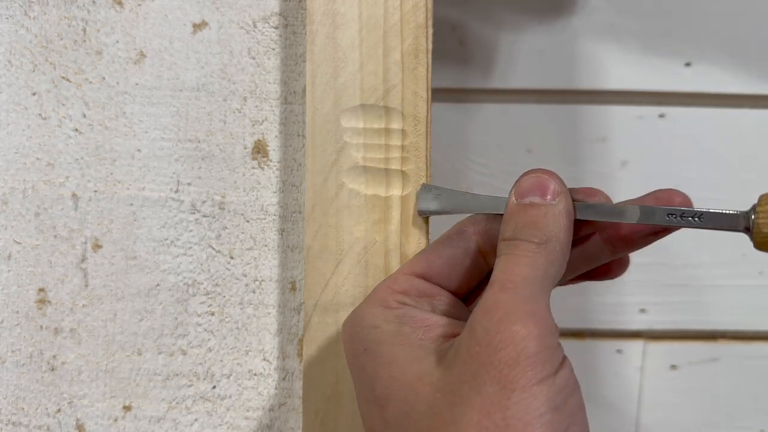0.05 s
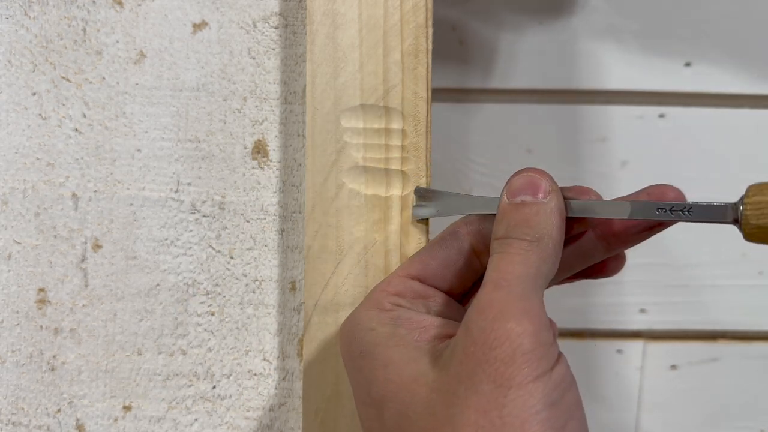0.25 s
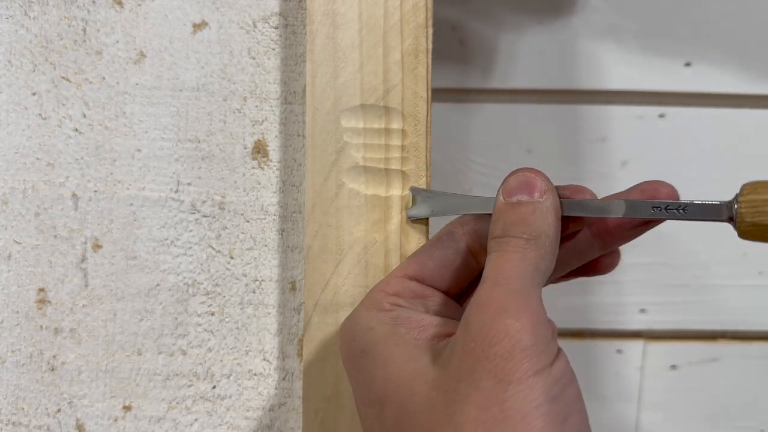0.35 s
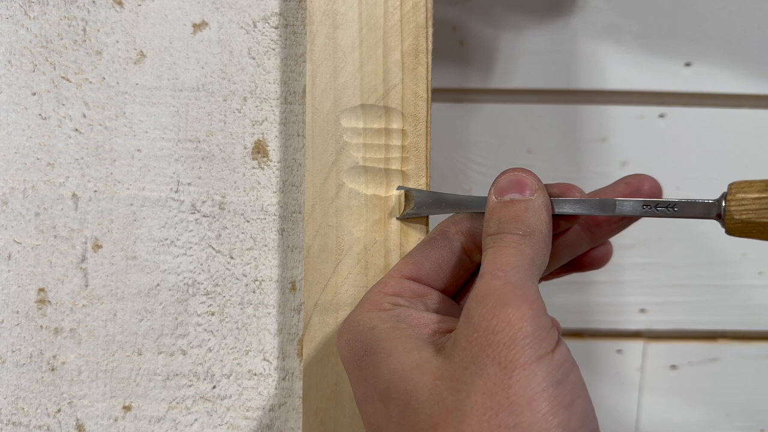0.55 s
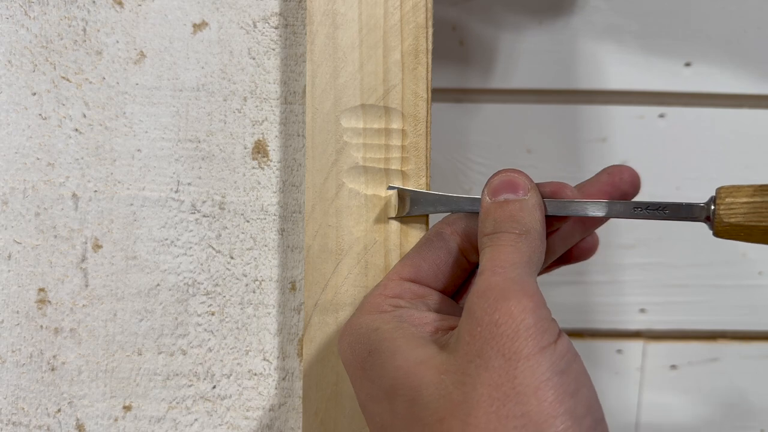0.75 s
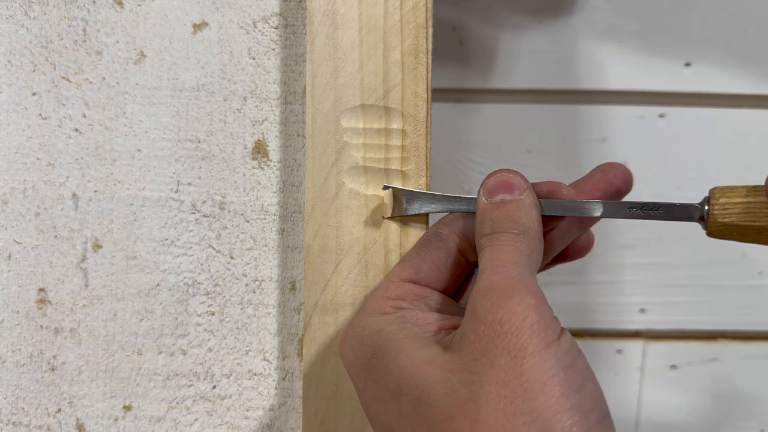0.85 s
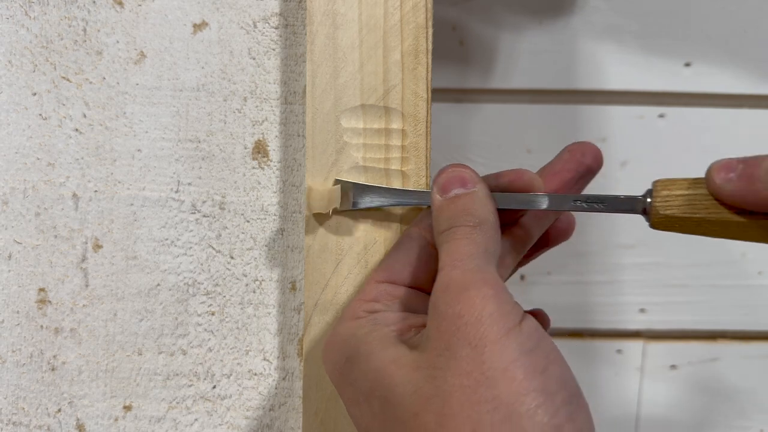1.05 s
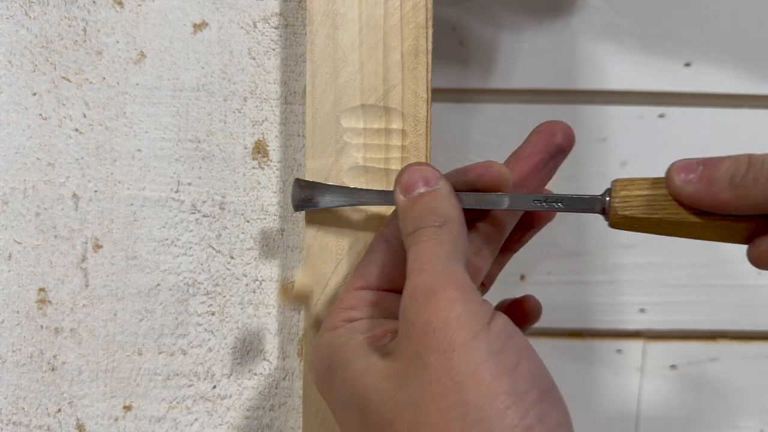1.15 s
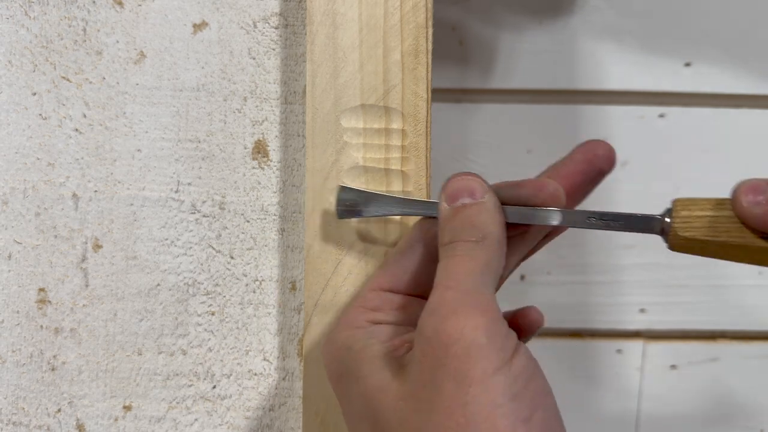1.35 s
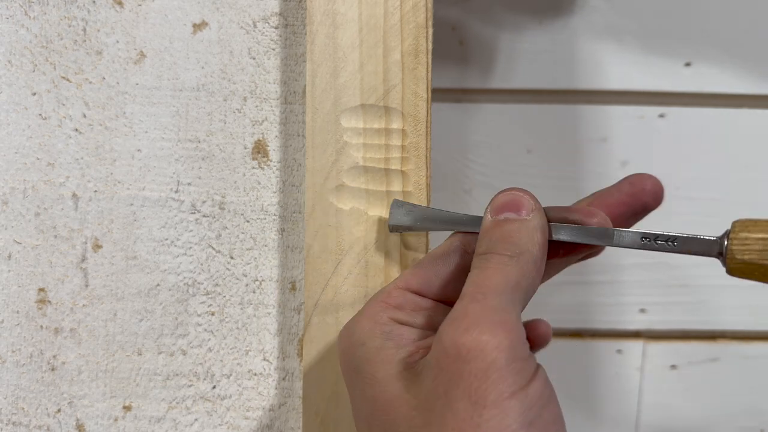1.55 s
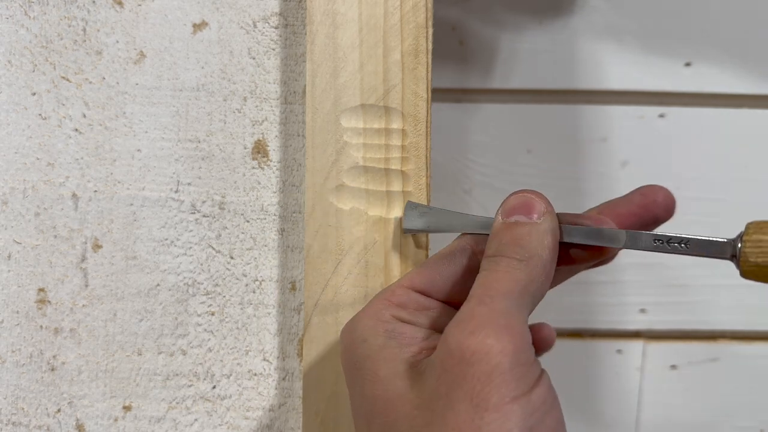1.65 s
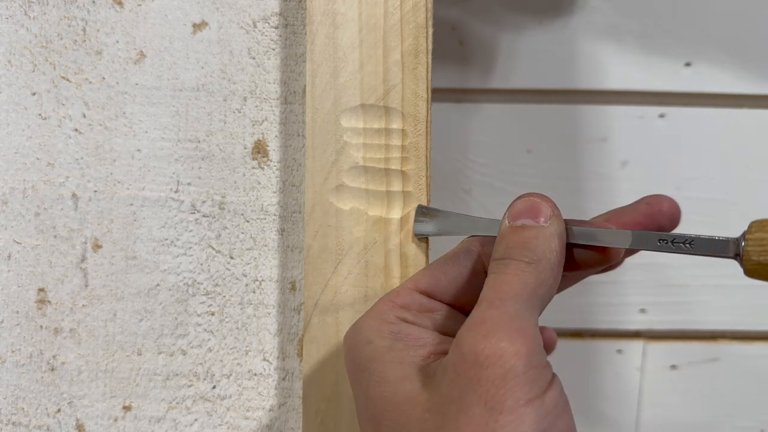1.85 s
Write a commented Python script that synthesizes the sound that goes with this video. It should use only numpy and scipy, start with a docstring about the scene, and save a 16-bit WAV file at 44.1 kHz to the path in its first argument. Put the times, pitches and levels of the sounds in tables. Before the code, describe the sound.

Three short crunching cuts of a gouge carving wood, then light taps of the blade.

```python
"""Three quick crunching, rasping strokes: a hand gouge cuts a softwood board close by in a small room.
Wood fibres snap under the edge and shake the board; in the last push the edge chatters and tears
the chip free. The blade ticks as it lifts, is set down with two taps and starts the next cut.
Underneath are soft thuds of the bench, a low rumble, a thin hum and a faint hiss of air."""
import sys
import numpy as np
from scipy import signal
from scipy.fft import rfft, irfft
from scipy.io import wavfile
from scipy.ndimage import uniform_filter1d

SR = 44100
rng = np.random.default_rng(int(sys.argv[2]) if len(sys.argv) > 2 else 0)


def digitize_waveform(pressure):
    """Quantize a signal to 16-bit integers and store it at the path in sys.argv[1].

    Rows of a 2-D input are taken as channels; values are limited to [-1, 1].
    """
    field = np.atleast_2d(pressure).T
    bounded = np.clip(field, -1, 1)
    quanta = np.round(bounded * 32767).astype(np.int16)
    wavfile.write(sys.argv[1], SR, quanta)


N = 83790
TIME = np.arange(N) / SR

# How loud the cut is. Each row: time in seconds, relative levels of the crunch and the rasp in dB.
CUT_LEVELS = [(0.06, -89.5, -100), (0.128, -73.5, -105), (0.143, -57, -82), (0.175, -47.5, -63.5),
              (0.206, -43.5, -58), (0.276, -47.5, -70.5), (0.296, -42.5, -64.5), (0.362, -42, -63.5),
              (0.385, -44, -67), (0.41, -55.5, -74.5), (0.448, -53.5, -73), (0.475, -42.5, -63.5),
              (0.508, -39.5, -54.5), (0.54, -39, -62.5), (0.602, -41, -62.5), (0.63, -70.5, -90.5),
              (0.741, -78, -85.5), (0.748, -53.5, -73.5), (0.785, -41.5, -63.5), (0.816, -42.5, -66),
              (0.866, -35.5, -54), (0.905, -39, -54.5), (0.955, -35, -49.5), (0.98, -36.5, -47.5),
              (1.026, -35, -62), (1.04, -65, -95), (1.1, -110, -120), (1.8, -110, -120),
              (1.828, -59.5, -76), (1.858, -58, -73.5), (1.868, -50.5, -62.5), (1.89, -45.5, -59),
              (1.9, -39.5, -56)]
SNAPS_PER_S, SNAP_SPREAD_DB = 3500, 3.0


def crunch(grip):
    """Snapping fibres shake the board and make it ring."""
    # The board's tone. Each row: frequency in Hz, relative level in dB.
    board_tone = [(40, -16), (110, -8.5), (220, -5), (275, -11.5), (360, -2.5), (680, -2.5), (1050, -8.5),
                  (1300, -10), (2150, -7), (2450, -15.5), (3100, -20.5), (4300, -23.5), (8000, -40),
                  (16000, -74.5)]
    fibres = snaps(SNAPS_PER_S, SNAP_SPREAD_DB) * grip * level(CUT_LEVELS)
    return amp(-2) * through(fibres, colour(board_tone, ringing_db))


def edge(grip):
    """The steel rasps finely in the wood, and the chip tears free with a bright rip."""
    # How loud the tearing is. Each row: time in seconds, relative level in dB.
    tear_levels = [(0.908, -100.5), (0.925, -43.5), (0.946, -36), (0.975, -41), (1.012, -39.5),
                   (1.018, -40.5), (1.026, -37.5), (1.031, -96)]
    # The tones of the rasp and the rip. Each row: frequency in Hz, relative level in dB.
    rasp_tone = [(500, -30.5), (2500, 5), (3300, 1), (4200, -4), (6300, 6.5), (7500, -5.5), (8600, 3),
                 (11000, 0), (12700, -3), (16000, -8)]
    rip_tone = [(500, -3.5), (3000, 1.5), (5000, -2.5), (6300, 1.5), (7600, -5), (9200, 3.5), (12200, 0),
                (14500, 1), (16000, -4)]
    scraping = splinters(per_s=5000, spread_db=1.5) * grip * level(CUT_LEVELS, column=2)
    tearing = splinters(per_s=4200, spread_db=-0.5) * grip * during(tear_levels)
    rasp = through(scraping, colour(rasp_tone, ringing_db))
    rip = through(tearing, colour(rip_tone, ringing_db))
    return amp(3) * rasp + amp(0.5) * rip


def chatter(grip, slips_per_s=405, slip_share=0.22):
    """Deep in the last push the edge sticks and slips unevenly, and the wood rasps low and hollow."""
    # How hard the edge bites. Each row: time in seconds, relative level in dB.
    bite_levels = [(0.83, -72.5), (0.87, -36.5), (0.91, -33.5), (0.943, -28.5), (0.952, -27.5),
                   (0.968, -26), (0.975, -40.5), (1.022, -46.5), (1.036, -68.5)]
    # The hollow tone. Each row: frequency in Hz, relative level in dB.
    hollow_tone = [(150, -33), (310, -28.5), (430, -0.5), (540, 0.5), (720, -2.5), (830, 0), (950, -8),
                   (1220, -7), (1400, -12.5), (2500, -13), (5000, -46)]
    slip_count = np.floor(np.cumsum(slips_per_s * waver(0.056, samples=130)) / SR)
    slips = np.diff(slip_count, prepend=0)  # one pulse for each slip
    fibres = snaps(SNAPS_PER_S, SNAP_SPREAD_DB)
    force = np.sqrt(slip_share) * unit(slips) + np.sqrt(1 - slip_share) * fibres
    return amp(-5) * through(force * grip * during(bite_levels), colour(hollow_tone, ringing_db))


def snaps(per_s, spread_db):
    """Fibres break at random moments, each making one pulse of random size."""
    size = amp(spread_db * np.minimum(rng.exponential(1, N), 4))
    return unit(size * rng.choice([-1, 1], N) * (rng.random(N) < per_s / SR))


def splinters(per_s, spread_db):
    """Fine snaps, some heard on both sides and some on one only."""
    sides = np.array([snaps(per_s, spread_db) for _ in range(2)])
    return unit(snaps(per_s, spread_db) + amp(1.5) * sides)


def ringing_db(hz):
    """Board and blade boost the frequencies at which they naturally ring."""
    # Each row: frequency in Hz, width in Hz, left boost in dB, right boost in dB.
    rings = [(372.7, 150, 3, 5), (833.5, 85, 6, 2.5), (1040, 58, 10.5, 1), (1200, 23, 14, 4),
             (1497, 40, 10.5, 7), (1671, 70, 7, 5), (2083, 120, 9.5, 1), (2888, 150, 15.5, 2.5),
             (3339, 120, 7, 3), (3722, 88, 12, 6), (6390, 230, 2, 0)]
    return sum(np.array([[left], [right]]) * peak(hz, centre, width)
               for centre, width, left, right in rings)


def taps():
    """The blade knocks dully on the board."""
    # Each row: start in seconds, relative level in dB, ring pitch in Hz.
    knocks = [(1.311, -39, 990), (1.7622, -45, 1450), (1.801, -21.5, 1964), (1.812, -33.5, 1486),
              (1.8632, -24, 1900)]
    # A knock's tone. Each row: frequency in Hz, relative level in dB.
    knock_tone = [(60, -19.5), (180, -1.5), (350, -1.5), (700, 2.5), (2100, -0.5), (2550, -7.5),
                  (4500, -27), (6400, -27), (7500, -38.5), (16000, -60.5)]
    out = np.zeros(N)
    for start, db, hz in knocks:
        add(out, start, amp(db) * contact(knock_tone, hz, fade_s=0.045, ring_s=0.025, ring_db=-2))
    return out


def ticks():
    """A faint trace of an earlier stroke dies away; later the edge clicks and snaps the chip off."""
    # Each row: start in seconds, relative level in dB, ring pitch in Hz, treble limit in Hz.
    bursts = [(0.003, -36.5, 4300, 4700), (0.788, -24, 6430, 12000), (1.0243, -9.5, 8800, 14470),
              (1.302, -50, 10210, 15100), (1.3112, -30, 10020, 15700), (1.321, -50, 10000, 15100),
              (1.8315, -29.5, 6400, 9400)]
    # Their tone. Each row: frequency in Hz, relative level in dB.
    burst_tone = [(300, -11), (2400, -4), (4000, -8), (6300, -8), (8500, -12.5), (11500, -2.5),
                  (13500, -0.5), (16000, 3.5)]
    out = np.zeros(N)
    for start, db, hz, top_hz in bursts:
        burst = contact(burst_tone, hz, fade_s=0.0052, ring_s=0.012, ring_db=-16.5)
        add(out, start, amp(db) * low_pass(burst, top_hz))
    return out[None]


def contact(tone, hz, fade_s, ring_s, ring_db, rise_s=0.00048, size=12000):
    """A brief contact: a burst of noise and one short ring."""
    t = TIME[:size]
    noise = dying(rng.standard_normal(size), fade_s)
    burst = signal.fftconvolve(noise, colour(tone))[:size]
    rise = 1 - np.exp(-(t / rise_s) ** 2)
    ring = dying(np.sin(2 * np.pi * hz * t) * rise, ring_s)
    return burst + amp(ring_db) * ring


def thuds(rise_s=0.0057, fade_s=0.31):
    """The bench gives a little as the hand leans on it, and thuds softly."""
    # Each row: start in seconds, level in dB, pitch in Hz.
    pushes = [(0.324, -50, 109.4), (0.409, -44, 51), (0.586, -48, 105.5), (1.803, -51.5, 169),
              (1.822, -50, 118)]
    out, t = np.zeros(N), TIME[:12000]
    shape = np.minimum(t / rise_s, 1) * amp(-60 * t / fade_s)
    for start, db, hz in pushes:
        add(out, start, amp(db) * shape * np.sin(2 * np.pi * hz * t))
    return out


def placed(x, right_delay_s=0.00013):
    """The board lies to the left: that side hears it earlier and, except in the high treble, louder."""
    # Each row: frequency in Hz, left level minus right level in dB.
    balance = [(100, 4.5), (250, 5), (500, 4.5), (1000, 9.5), (1500, 1.5), (2500, 1.5), (4500, 5.5),
               (9000, -10.5)]
    hz = np.fft.rfftfreq(2 * N, 1 / SR)
    lean = amp(read(balance, hz))
    delay = np.exp(-2j * np.pi * hz * right_delay_s)
    sides = np.array([lean, delay]) * np.sqrt(2 / (1 + lean ** 2))
    return irfft(rfft(x, 2 * N) * sides)[:, :N]


def scatter(x, echo_db=-7.5):
    """Nearby surfaces add quick echoes, different on each side."""
    echoes = dying(rng.standard_normal((2, 3000)), fade_s=0.0083)
    return (x + amp(echo_db) * through(x, echoes)) / np.sqrt(1 + amp(echo_db) ** 2)


def room(x, onset_s=0.009):
    """The workshop's echoes blur into a fading tail in which a few pitches stand out."""
    # Each row: frequency in Hz, seconds the tail takes to fade by 60 dB.
    fade_times = [(100, 1), (350, 0.62), (600, 0.71), (1400, 0.6), (2500, 0.57), (5000, 0.54),
                  (10000, 0.32), (16000, 0.21)]
    # Where the room rings. Each row: frequency in Hz, width in Hz, boost in dB.
    room_rings = [(690, 47, 7), (1430, 130, 9), (3230, 140, 12)]
    hz, t, noise = signal.stft(rng.standard_normal((2, SR)), SR, nperseg=1024)
    boost_db = sum(db * peak(hz, centre, width) for centre, width, db in room_rings)
    fade_db = 60 * t / read(fade_times, hz)[:, None]
    tail = signal.istft(noise * amp(boost_db[:, None] - fade_db), SR, nperseg=1024)[1]
    tail *= np.minimum(TIME[:tail.shape[1]] / onset_s, 1) ** 2
    return through(x, tail / np.linalg.norm(tail[0]))


def hum(hz=52):
    """A thin, wavering low hum."""
    cycles = np.cumsum(hz * waver(0.07, samples=3000)) / SR
    return amp(-67.5) * unit(np.sin(2 * np.pi * cycles))


def background():
    """The room rumbles, nearly alike on both sides, under a faint hiss of air."""
    # The tones of the rumble and the air. Each row: frequency in Hz, relative level in dB.
    rumble_tone = [(15, -27), (32, -15), (43, -6.5), (51, 0), (64, -2), (82, -11), (110, -8), (140, -21),
                   (260, -35), (600, -60.5), (2000, -84)]
    air_tone = [(50, 5.5), (400, 3), (1000, -8.5), (3000, -15.5), (6500, -16.5), (8000, -21),
                (14000, -22.5), (16000, -44.5)]
    # How the rumble swells and sinks. Each row: time in seconds, level in dB.
    rumble_levels = [(0, -56), (0.12, -60.5), (0.26, -50), (0.43, -51), (0.49, -56), (0.57, -47),
                     (0.7, -58), (0.86, -54), (0.95, -51), (1.2, -57), (1.55, -58), (1.68, -52),
                     (1.73, -60), (1.9, -54)]
    noise = rng.standard_normal(N) + 0.13 * rng.standard_normal((2, N))
    rumble = through(noise, colour(rumble_tone, size=16384))
    air = through(rng.standard_normal((2, N)), colour(air_tone))
    return unit(rumble) * level(rumble_levels) + amp(-77.5) * unit(air)


def amp(db):
    """Turns decibels into a multiplier."""
    return 10 ** (np.asarray(db) / 20)


def unit(x):
    """Scales a signal to an average power of 1."""
    return x / np.sqrt(np.mean(x ** 2) + 1e-20)


def read(points, hz):
    """Looks up values between a table's frequencies, with octaves evenly spaced."""
    table_hz, value = np.transpose(points)
    return np.interp(np.log(hz + 1), np.log(table_hz), value)


def level(table, column=1):
    """Turns a table of times and decibels into a volume curve."""
    rows = np.array(table)
    return amp(np.interp(TIME, rows[:, 0], rows[:, column]))


def during(table):
    """A volume curve that is silent before its first row and after its last."""
    return level(table) * (TIME > table[0][0]) * (TIME < table[-1][0])


def waver(depth, samples):
    """A speed that wanders around 1; more samples make it wander more slowly."""
    return 1 + depth * unit(uniform_filter1d(rng.standard_normal(N), size=samples))


def peak(hz, centre, width):
    """A smooth bump of height 1 around one frequency."""
    return 1 / (1 + (2 * (hz - centre) / width) ** 2)


def add(mix, start_s, sound):
    """Mixes a sound in at a given time."""
    part = mix[round(start_s * SR):][:len(sound)]
    part += sound[:len(part)]


def through(x, response):
    """Filters a signal: every sample sets off a copy of the response."""
    return signal.fftconvolve(np.atleast_2d(x), np.atleast_2d(response), axes=1)[:, :N]


def colour(tone, boost_db=None, size=4096):
    """Builds a filter's response to one pulse from a tone table and optional boosts."""
    hz = abs(np.fft.fftfreq(size, 1 / SR))
    gain = unit(amp(read(tone, hz))) * (1 if boost_db is None else amp(boost_db(hz)))
    spectrum = np.exp(np.conj(signal.hilbert(np.log(gain))))  # rings after the pulse, never before
    return np.fft.ifft(spectrum).real[..., :size // 2]


def dying(x, fade_s):
    """Fades a sound by 60 dB every fade_s seconds and scales its energy to 1."""
    faded = x * amp(-60 * TIME[:x.shape[-1]] / fade_s)
    return faded / np.linalg.norm(faded, axis=-1, keepdims=True)


def low_pass(x, hz):
    """Gently turns down everything above a frequency."""
    return signal.sosfilt(signal.butter(2, hz, fs=SR, output="sos"), x)


def scene():
    """Mixes board and blade with the room's echoes and the background."""
    # The edge catches and slips in the grain, so the cut's level flutters a little.
    grip = amp(-0.63 * unit(low_pass(rng.standard_normal(N), hz=170.3)))
    wood = crunch(grip) + chatter(grip) + taps()
    steel = edge(grip)
    clicks = ticks()
    near = scatter(placed(wood)) + steel + clicks
    soft_clicks = low_pass(clicks, hz=13000)  # the room soaks up their highest treble
    into_room = amp(-11) * wood.mean(0) + amp(-12) * steel + amp(-2.5) * soft_clicks
    return near + room(into_room) + thuds() + hum() + background()


def record(dry, top_hz=15950):
    """Cuts off the very highest treble."""
    treble_cut = signal.firwin(511, top_hz, window=("kaiser", 9), fs=SR)
    return signal.oaconvolve(dry, treble_cut[None], "same")


dry = scene()
out = record(dry)
digitize_waveform(out)
```